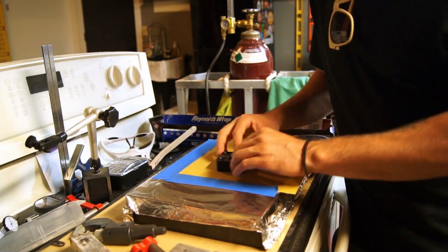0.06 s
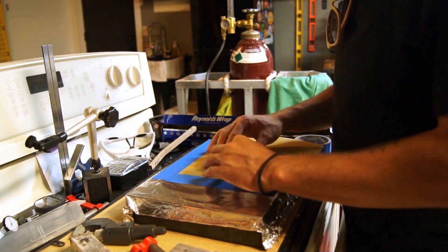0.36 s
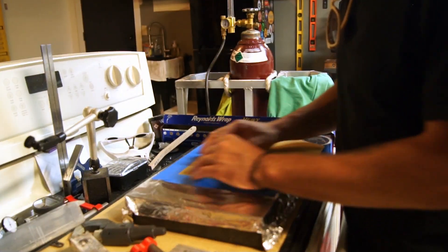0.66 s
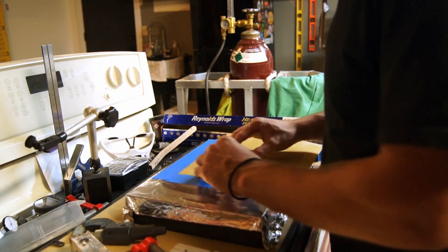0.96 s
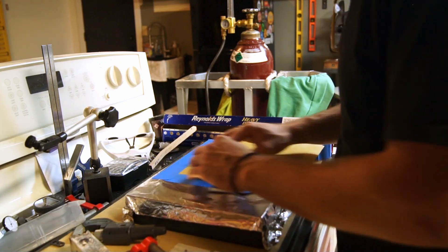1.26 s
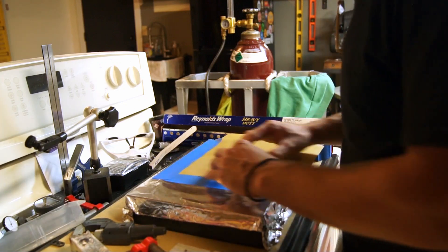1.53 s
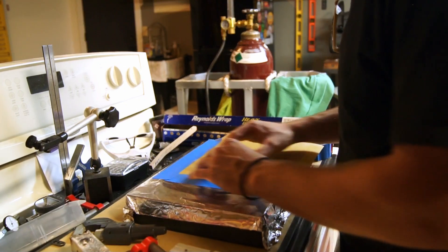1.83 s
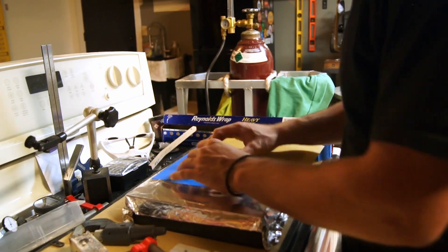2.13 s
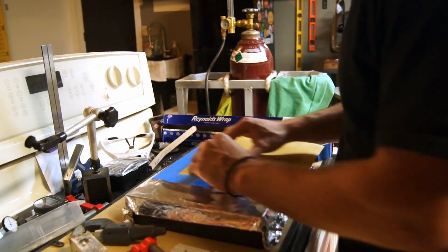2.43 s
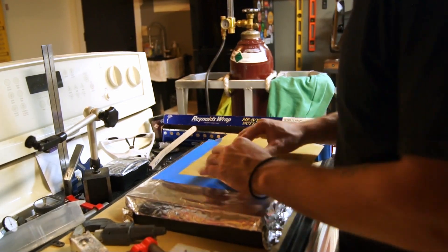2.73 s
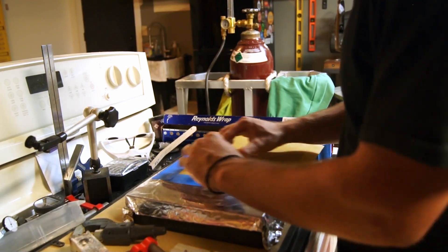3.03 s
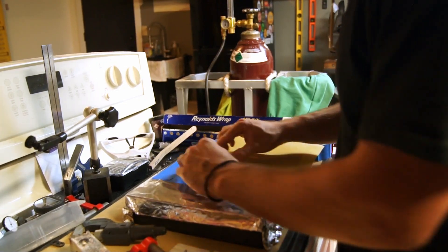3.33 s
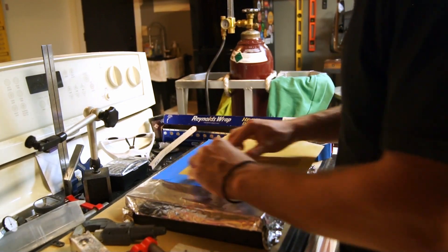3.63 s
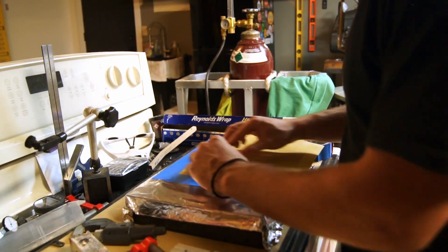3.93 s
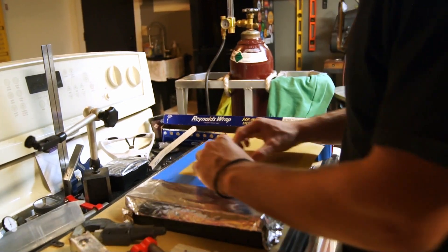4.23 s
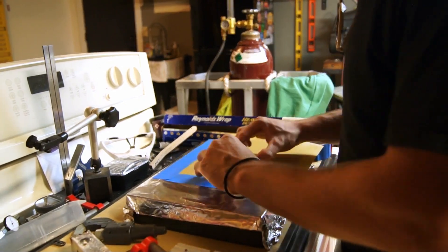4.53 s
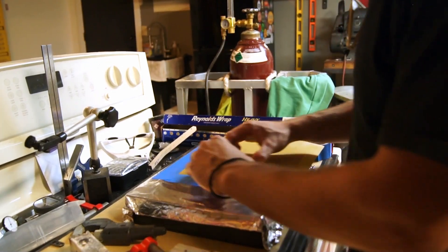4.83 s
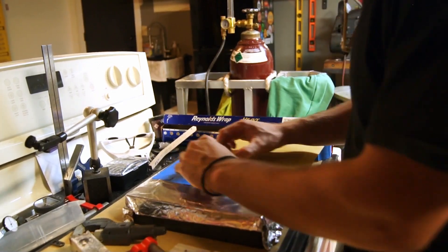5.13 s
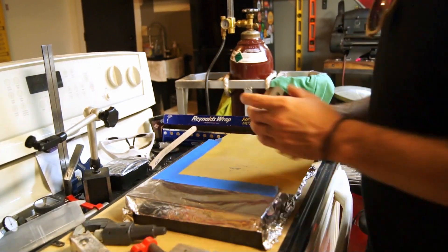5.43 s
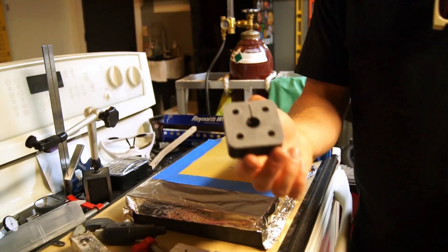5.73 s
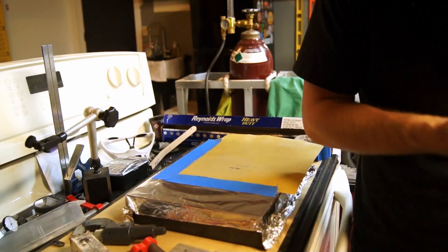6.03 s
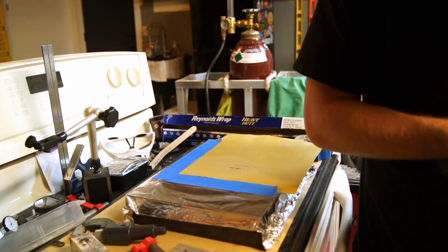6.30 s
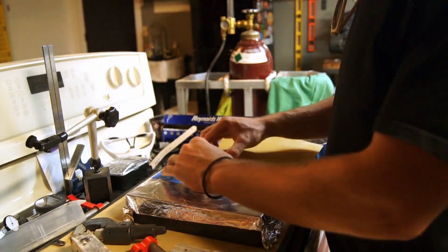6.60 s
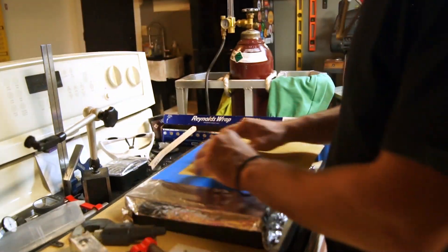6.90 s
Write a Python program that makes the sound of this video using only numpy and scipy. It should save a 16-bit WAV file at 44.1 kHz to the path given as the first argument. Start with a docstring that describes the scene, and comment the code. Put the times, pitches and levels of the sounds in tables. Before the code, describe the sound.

A plastic part is rubbed on sandpaper over a stone plate, sped up so the strokes blur into a bright, fluttering hiss with a few small knocks. After about five and a half seconds the sanding stops. Fingers brush the part, it clacks twice and is set down, and the sanding resumes. The sound is close, with a faint workshop fan hum underneath.

```python
"""Sped-up sanding of a plastic part on sandpaper over a stone plate; the strokes blur into a
fluttering hiss. Grit cuts the plastic, and the part sings in two broad resonances and knocks a few
times. At 5.5 s the sanding stops; fingers brush the lifted part, it clacks twice and is set down.
At 6.7 s the sanding goes on. Underneath, the bench rumbles and takes soft bumps, and a workshop
hums and whirs faintly throughout."""
import sys
import numpy as np
from scipy import signal
from scipy.fft import rfft, irfft
from scipy.io import wavfile

SR = 44100
rng = np.random.default_rng(int(sys.argv[2]) if len(sys.argv) > 2 else 0)


def output_pcm(signal):
    """Save a mono or channel-first signal as 16-bit PCM at the path in sys.argv[1].

    Samples are clipped to [-1, 1] before scaling.
    """
    pcm = np.clip(np.atleast_2d(signal).T, -1, 1) * 32767
    wavfile.write(sys.argv[1], SR, np.round(pcm).astype(np.int16))


N = 311346
TIME = np.arange(N) / SR
FREQS = np.fft.rfftfreq(N, 1 / SR)

# the two bouts of sanding: (start [s], stop [s])
BOUTS = [(-.01, 5.524), (6.686, 7.1)]
# pace of the sped-up strokes, one list per bout, counted from a turn: (time [s], pace [strokes/s])
STROKE_PACE = [
    [(0.084, 40.5), (0.4, 39.0), (0.86, 53.0), (1.104, 39.0), (1.55, 40.0), (1.81, 30.0), (2.28, 44.0),
     (2.47, 47.0), (2.7, 46.0), (3.26, 41.5), (3.53, 44.5), (3.824, 48.0), (4.1, 43.5), (4.41, 50.0),
     (4.76, 46.0), (5.29, 44.5), (5.524, 47.5)],
    [(6.68, 39.5), (6.87, 43.0), (7.06, 46.0)],
]
# the hand bears down while the paper clogs and dulls: (time [s], level [dB], brightness [dB])
HAND_PRESSURE = [(0, -31.5, -2), (.1, -27, 2.5), (.27, -27.5, 4), (.52, -27, .7), (.85, -25.5, 0),
                 (1.15, -26.5, -1), (1.52, -26, 2), (2.3, -27, .3), (2.8, -26, 0.5), (3.2, -26.6, 0.4),
                 (4.05, -27, -.5), (4.33, -26, 0.5), (4.6, -27, -1), (5.4, -26, -1), (6.7, -26.5, 2.5),
                 (7.05, -27.5, 1)]
# extra hard pushes: (time [s], boost [dB])
HARD_PUSHES = [(0.046, 5.5), (.126, 3.5), (.172, 4.5), (.249, 4), (.321, 3), (.4, 2), (.431, 4.5),
               (.589, 1.5), (1.19, 2.5), (1.38, 3.5), (1.87, 1.5), (2.135, 4.5), (2.705, 2.5), (2.967, 1.5),
               (5.495, 0.5), (6.692, 1)]
# the hand stalls for an instant: (time [s], dip [dB], half length [s])
HAND_STALLS = [(0.029, -17, 0.0051), (0.067, -10, 0.0068), (0.084, -30, 0.0044), (0.15, -9.5, 0.0056),
               (1.355, -3, .012), (1.855, -7, 0.0059), (2.343, -11, 0.0064), (2.952, -11.5, 0.0059),
               (4.622, -5, 0.008)]
# grit cutting plastic: (frequency [Hz], relative level [dB])
RASP_SPECTRUM = [(1900, -85), (2250, -22.5), (2600, -9), (3000, -5), (3650, -1.5), (4300, -1.5), (5800, -5),
                 (6900, -1), (8400, -1), (9600, -6), (11000, -11.5), (13000, -11.5), (14500, -17.5),
                 (16000, -26.5)]
# the same scrape heard through part and plate: (frequency [Hz], relative level [dB])
BODY_SPECTRUM = [(40, -32), (150, -15), (400, -17), (750, -7.5), (1030, -9.5), (1380, 0.5), (1560, -0.5),
                 (1720, -1), (2100, -3.5), (2800, -9), (5000, -58)]
# clacks and knocks of the part: (time [s], level [dB], half length [s], edge share [0-1], snap [dB])
PART_KNOCKS = [(1.8, -30, 0.0036, 0.6, 16), (4.323, -29.5, 0.0031, 0.3, 7), (4.65, -31.5, 0.0022, 0.51, 11),
               (4.705, -28.5, 0.0031, 0.6, 21), (5.796, -50, 0.0051, 0.2, -4),
               (6.136, -24, 0.008, 0.13, -5), (6.2866, -23, 0.0068, 0.94, -2.5),
               (6.584, -42.5, 0.0017, 0.6, -14), (6.6462, -33, 0.003, 0.26, 11)]
# the part's resonances: (frequency [Hz], width [Hz], face-hit level [dB], edge-hit level [dB])
PART_MODES = [(340, 69, -9, 7), (460, 67, 5, 11.5), (574, 81, -2, -13), (668, 67, 3, 10),
              (907, 78, 12, -21), (1165, 66, 11, -13), (1397, 120, 8.5, 12), (1697, 51, 2, 8.5),
              (1860, 68, -0.5, -21), (2690, 130, -8, -8), (2880, 180, 1, -25), (3150, 86, -5, -17),
              (3570, 80, -10, -9), (3900, 130, -18, 0), (4650, 120, 4, -2), (5050, 180, -18, -12),
              (5500, 200, -25, -9), (6560, 260, -23, 2), (7800, 550, -27, -29)]
# the dry snap of a knock: (frequency [Hz], relative level [dB])
SNAP_SPECTRUM = [(170, -10), (400, -6), (600, -2.5), (1500, 2), (2200, 1), (3100, 8.5), (4300, 3.5),
                 (8000, -1), (10000, -20), (14000, -35), (16000, -25)]
# fingers and grit brush the part: (time [s], relative level [dB], half length [s], brightness [dB])
FINGER_BRUSHES = [(5.57, -51, .015, 12), (5.635, -42.5, 0.0057, -23), (5.765, -48, 0.014, -1),
                  (5.806, -47, 0.0054, -19), (5.878, -49.5, 0.016, -6), (5.944, -48.5, 0.012, 6),
                  (6.006, -50, .007, 8), (6.078, -48.5, 0.045, -5), (6.196, -42.5, 0.0078, 11),
                  (6.234, -49, .012, 1), (6.325, -45.5, 0.009, 6), (6.386, -47, 0.01, 13),
                  (6.638, -30, 0.0014, -2), (6.669, -33, 0.006, -5)]
# skin rubbing dusty plastic: (frequency [Hz], relative level [dB])
SKIN_SPECTRUM = [(1900, -16), (2700, -1.5), (3700, 1), (5800, -4.5), (8000, -1), (10000, -7), (13000, -15),
                 (16000, -17)]
# small things clink: (time [s], level [dB], ring time [s], pitch [Hz])
SMALL_CLINKS = [(.163, -51, 0.013, 428), (2.333, -46.5, 0.004, 830), (6.083, -36, 0.0033, 1330),
                (6.107, -45, 0.0026, 1300)]
# soft bumps against the bench: (time [s], thud level [dB], rumble level [dB])
BENCH_BUMPS = [(.615, -59, -71), (1.766, -58, -71), (4.119, -45, -71), (4.64, -59, -67), (4.949, -54, -62),
               (5.75, -46, -72), (5.85, -53, -74), (6.064, -55, -67), (6.636, -54, -77)]
# the workshop's room tone: (frequency [Hz], relative level [dB])
AIR_SPECTRUM = [(25, -22), (60, -20), (110, -17.5), (170, 0), (260, -1), (360, 0.5), (550, 0), (760, 0),
                (1080, -7.5), (1350, -5), (1800, -9.5), (2150, -22), (2700, -12), (7500, -15), (11000, -24),
                (16000, -34)]
# the room tone rises and sinks: (time [s], gain [dB])
AIR_SWELL = [(0, 1.5), (.7, -3.5), (2.8, -2.5), (3.6, 0.5), (6.5, 0.5), (7.05, -2.5)]
# a fan's whir: (frequency [Hz], width [Hz], relative level [dB])
FAN_WHIR = [(1412, 24, 1), (2570, 90, 0.5), (4880, 160, -1), (6620, 83, 3), (6750, 160, -9)]
# the fan's hum: (frequency [Hz], level [dB])
FAN_HUM = [(189.8, -66.5), (379.2, -68)]


def sanding(fade_s=0.007, grit_db=-16, body_db=-22.5, ring_db=-11, chatter_db=0.4, rocking_db=2, bite=0.32):
    """Countless grains cut the plastic; coarse ones tick out, and the rocking part shifts the colour."""
    outside_s = np.min([np.maximum(start - TIME, TIME - stop).clip(0) for start, stop in BOUTS], axis=0)
    force = strokes() * np.exp(-np.minimum(outside_s / fade_s, 20))
    cutting = unit_rms(rng.standard_normal(N) + gain_of(grit_db) * grains(per_s=3000, spread_db=4))
    # faster strokes are brighter; their loudness stands for their speed
    speed_db = 20 * np.log10(np.maximum(force / np.median(force), 0.1))
    times, _, bright_db = np.transpose(HAND_PRESSURE)
    treble_db = np.interp(TIME, times, bright_db) + bite * speed_db + rocking_db * wander(per_s=65)
    rasp = brighten(colour(cutting, contour(RASP_SPECTRUM)), treble_db)
    body = gain_of(body_db + wander(per_s=8.1)) * colour(cutting, contour(BODY_SPECTRUM))
    ring = gain_of(ring_db) * singing()
    chatter = gain_of(chatter_db * wander(per_s=230))
    return (rasp + ring + body) * force * chatter


def strokes(uneven_db=0.81, turn_db=-3.5, roundness=0.44, push_half_s=0.006):
    """The envelope of the sped-up strokes: it peaks in mid-stroke and sags at each turn."""
    times, press_db, _ = np.transpose(HAND_PRESSURE)
    peak_db = np.interp(TIME, times, press_db) + uneven_db * wander(per_s=24)
    push_db = sum(db * swell(at, push_half_s) for at, db in HARD_PUSHES)
    # a round turn keeps the part moving, a sharp one nearly stops it
    sharpness = np.maximum(1 + roundness * wander(per_s=23), 0)
    sag_db = turn_db * sharpness * np.cos(np.pi * stroke_count()) ** 4
    stall_db = sum(dip_db * swell(at, half_s) for at, dip_db, half_s in HAND_STALLS)
    return gain_of(peak_db + push_db + sag_db + stall_db)


def stroke_count():
    """Strokes made so far in the present bout; whole numbers are turns."""
    count = np.zeros(N)
    for pace, (start, _) in zip(STROKE_PACE, BOUTS):
        times, per_s = np.transpose(pace)
        total = np.cumsum(np.interp(TIME, times, per_s)) / SR
        count = np.where(TIME >= start, total - np.interp(times[0], TIME, total), count)
    return count


def singing(grip_hz=3634, rise_hz_per_s=42, drift_hz=190, rock_hz=3150, roam_hz=280, waver_db=3):
    """Two resonances sing: one follows the grip up through each bout, one roams as the part rocks."""
    (first_start, _), (second_start, _) = BOUTS
    in_bout_s = TIME - np.where(TIME < second_start, first_start, second_start)
    grip_pitch = grip_hz + rise_hz_per_s * in_bout_s + drift_hz * wander(per_s=29)
    rasp_eq = contour(RASP_SPECTRUM)
    grip = resonate(hiss(rasp_eq), grip_pitch, width_hz=230)
    rocking = resonate(hiss(rasp_eq), rock_hz + roam_hz * wander(per_s=16.6), width_hz=330)
    grip_gain = gain_of(waver_db * wander(per_s=26))
    rocking_gain = gain_of(-5 + waver_db * wander(per_s=13))
    return grip * grip_gain + rocking * rocking_gain


def knocks(size=4096, low_cut_hz=260):
    """Each clack is a smeared knock that swells and fades, coloured by the part's modes."""
    out = np.zeros(N)
    t, hz = np.arange(size) / SR, np.fft.rfftfreq(size, 1 / SR)
    bass_cut = (1 - np.exp(-(hz / low_cut_hz) ** 2)) ** 2  # a small part radiates little bass
    for at, level_db, half_s, edge, snap_db in PART_KNOCKS:
        modes = [(f, width, (1 - edge) * face_db + edge * edge_db)
                 for f, width, face_db, edge_db in PART_MODES]
        envelope = swell(t[size // 2], half_s, t)
        smear = grains(per_s=5500, spread_db=3.5, size=size)
        ring = colour(smear, resonances(modes, hz) * bass_cut)
        snap = gain_of(snap_db) * colour(smear, contour(SNAP_SPECTRUM, hz))
        clack = unit_rms((ring + snap) * envelope) * np.sqrt(np.mean(envelope ** 2))
        start = round(at * SR) - size // 2
        out[start:start + size] += gain_of(level_db) * clack
    return out


def handling(brush_db=-1):
    """Gritty little brushes of the fingers, and short clinks from bumped things."""
    grit = colour(grains(per_s=2900, spread_db=2), contour(SKIN_SPECTRUM))
    brushes = sum(gain_of(db) * swell(at, half_s) * brighten(grit, treble_db, split_hz=7500)
                  for at, db, half_s, treble_db in FINGER_BRUSHES)
    clinks = sum(bump(*clink) for clink in SMALL_CLINKS)
    return gain_of(brush_db) * brushes + clinks


def bench(rest_db=-77, uneven_db=3.5, lag_s=0.022, centre_hz=80, width_hz=90):
    """The bench rumbles under the work; each bump rings its low mode and shakes it for a moment."""
    rumble = hiss(resonances([(centre_hz, width_hz, 0)]) ** 2)
    resting = gain_of(rest_db + uneven_db * wander(per_s=4))
    shaken = sum(gain_of(db) * swell(at + lag_s, half_s=0.055) for at, _, db in BENCH_BUMPS)
    thuds = sum(bump(at, db, ring_s=0.008, hz=147.5) for at, db, _ in BENCH_BUMPS)
    return rumble * (resting + shaken) + thuds


def workshop(air_db=-53, whir_db=-60, waver_hz=2.7, flutter_db=2):
    """A bed of slowly swelling room tone, with a fan's wavering hum and narrow whirs."""
    hum = np.zeros(N)
    for hz, db in FAN_HUM:
        cycles = np.cumsum(hz + waver_hz * wander(per_s=9.8)) / SR
        hum += np.sqrt(2) * gain_of(db + flutter_db * wander(per_s=3)) * np.sin(2 * np.pi * cycles)
    air = gain_of(air_db + np.interp(TIME, *np.transpose(AIR_SWELL))) * hiss(contour(AIR_SPECTRUM))
    whir = gain_of(whir_db + flutter_db * wander(per_s=10)) * hiss(resonances(FAN_WHIR))
    return air + whir + hum


def bump(at, level_db, ring_s, hz):
    """One damped mode, pushed softly: it builds up for ring_s, then dies away."""
    age = np.clip((TIME - at) / ring_s, 0, 20)
    envelope = age * np.exp(1 - age)
    return gain_of(level_db) * np.sqrt(2) * envelope * np.sin(2 * np.pi * hz * (TIME - at))


def grains(per_s, spread_db, size=N):
    """A crackle of tiny clicks of uneven strength, at rms 1."""
    strength = gain_of(spread_db * np.minimum(rng.exponential(1, size), 4))
    return unit_rms(strength * rng.choice([-1, 1], size) * (rng.random(size) < per_s / SR))


def hiss(response):
    """Coloured noise at rms 1."""
    return colour(rng.standard_normal(N), response)


def wander(per_s):
    """Smooth random modulation at rms 1, up to about the given rate."""
    return hiss(np.exp(-(FREQS / per_s) ** 2))


def swell(at, half_s, t=TIME):
    """A bell-shaped envelope that peaks at the given time."""
    return np.exp(-np.minimum(((t - at) / half_s) ** 2 / 2, 20))


def brighten(x, treble_db, split_hz=5500):
    """Tilt EQ: tips the balance between the lows and highs of a rasp."""
    low = irfft(rfft(x) / (1 + (FREQS / split_hz) ** 6), N)
    tilt = gain_of(treble_db)
    return (low + tilt * (x - low)) / np.sqrt((1 + tilt ** 2) / 2)


def resonate(x, hz, width_hz):
    """A swept band-pass that follows the curve hz; comes out at rms 1."""
    carrier = np.exp(2j * np.pi * np.cumsum(hz) / SR)
    pole = np.exp(-np.pi * width_hz / SR)
    return unit_rms((carrier * signal.lfilter([1 - pole], [1, -pole], x / carrier)).real)


def resonances(modes, hz=FREQS):
    """Complex response of modes given as (frequency [Hz], width [Hz], level [dB])."""
    return sum(gain_of(db) * 1j * hz * width / (f ** 2 - hz ** 2 + 1j * hz * width)
               for f, width, db in modes)


def contour(points, hz=FREQS):
    """An EQ curve through (frequency [Hz], level [dB]) points, joined on a log axis."""
    f, db = np.transpose(points)
    return gain_of(np.interp(np.log(hz + 1), np.log(f), db))


def colour(x, response):
    """Filters x and returns it at rms 1."""
    return unit_rms(irfft(rfft(x) * response, len(x)))


def unit_rms(x):
    """Scales to rms 1."""
    return x / np.sqrt(np.mean(x ** 2) + 1e-20)


def gain_of(db):
    """Decibels to amplitude."""
    return 10 ** (np.asarray(db) / 20)


def scene():
    """All layers, close up and in mono."""
    return (sanding() + knocks() + handling() + bench() + workshop())[None]


def record(dry):
    """A steep high cut takes off the very top of the hiss."""
    high_cut = signal.firwin(511, cutoff=15900, window=("kaiser", 9), fs=SR)
    return signal.oaconvolve(dry, high_cut[None], "same")


dry = scene()
out = record(dry)
output_pcm(out)
```